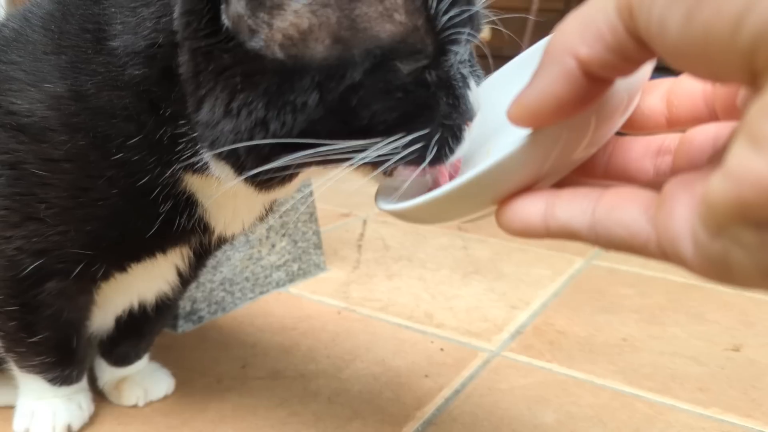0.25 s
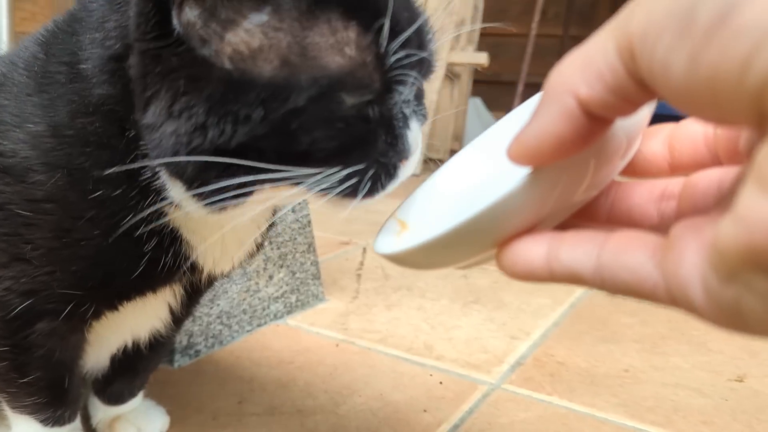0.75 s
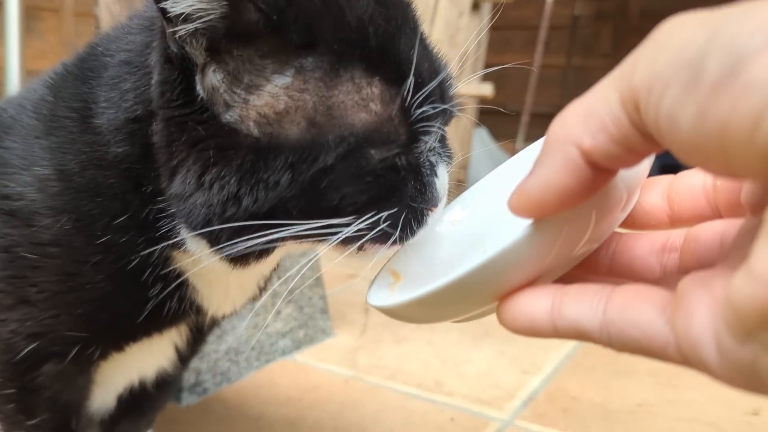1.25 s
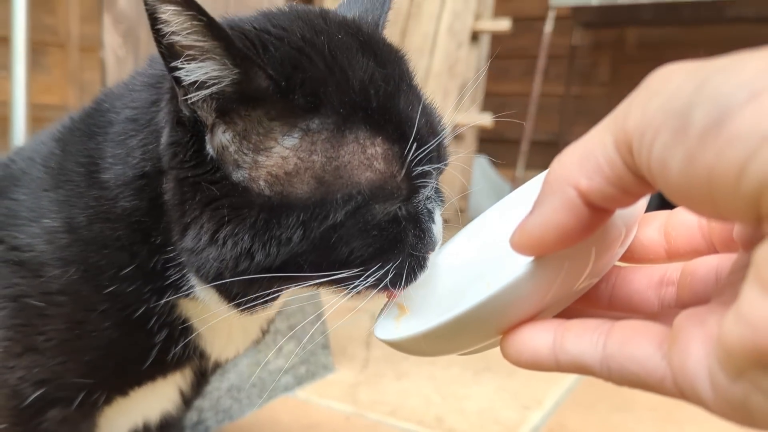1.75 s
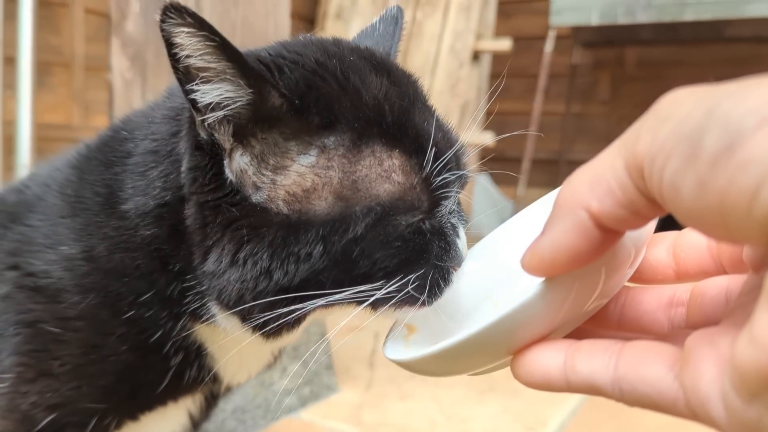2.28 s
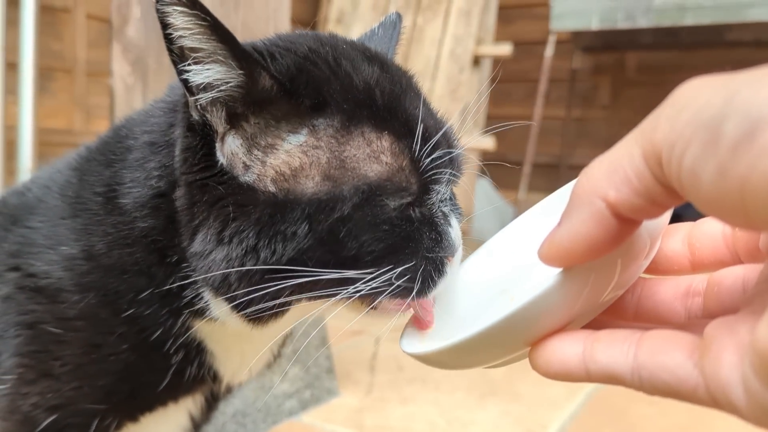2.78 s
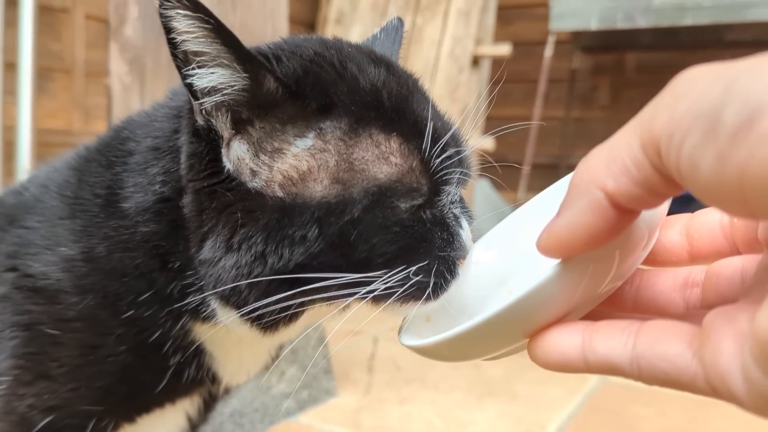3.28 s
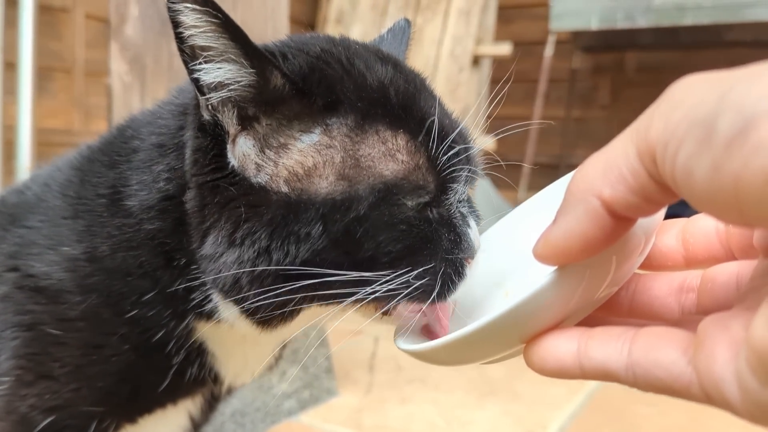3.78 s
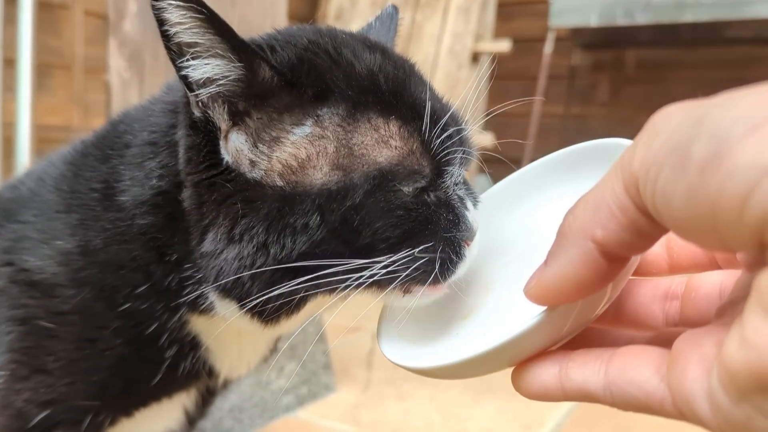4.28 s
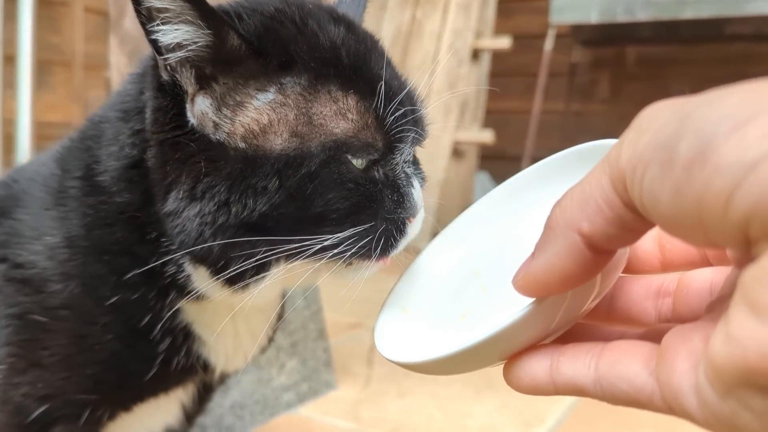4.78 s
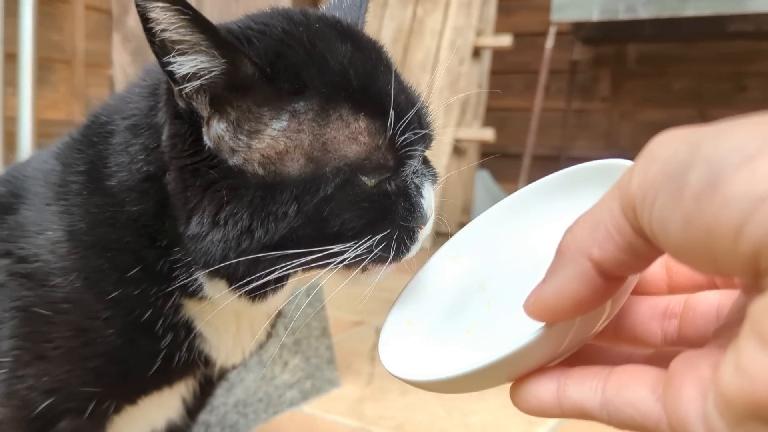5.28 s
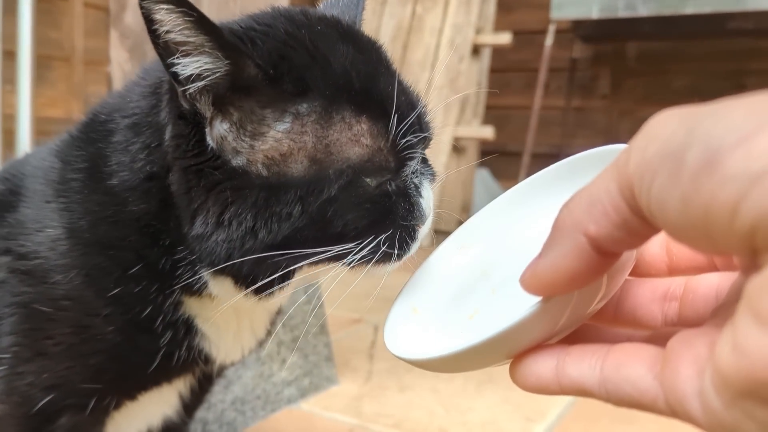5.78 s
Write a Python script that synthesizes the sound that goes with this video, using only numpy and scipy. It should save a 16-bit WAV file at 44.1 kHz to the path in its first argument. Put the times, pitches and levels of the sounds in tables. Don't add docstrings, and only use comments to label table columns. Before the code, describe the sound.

In a tiled yard, faint lip sounds give way to distinct moist clicks and dry scrapes as a cat laps close to the microphone, slightly to the right. Small birds a few metres away give quick high chirps and buzzy notes in the middle, with short wall echoes. The sharpest smacks come near five seconds. Distant traffic rumbles softly throughout, and fingers thump the phone occasionally.

```python
import sys
import numpy as np
from scipy import signal
from scipy.fft import rfft, irfft, next_fast_len
from scipy.io import wavfile
from scipy.ndimage import uniform_filter1d

SR = 44100
rng = np.random.default_rng(int(sys.argv[2]) if len(sys.argv) > 2 else 0)


def amplitude_ratio(level_db):
    exponent = np.asarray(level_db, float) / 20
    return 10 ** exponent


def inscribe(sig):
    pcm = np.round(np.clip(np.atleast_2d(sig).T, -1, 1) * 32767)
    wavfile.write(sys.argv[1], SR, pcm.astype(np.int16))


N = 266793
M = next_fast_len(N)
t = np.arange(N) / SR

# freq_hz, density_db [dB per Hz]
TOWN_SPECTRUM = [(15, -48), (45, -17), (92, -4), (131, -3.5), (356, -11), (702, -15), (1100, -24),
                 (1540, -26.5), (2800, -28), (3290, -34), (3870, -29), (4320, -36), (6140, -33.5),
                 (7630, -37), (15500, -37), (16300, -55)]
# freq_hz, correlation [0..1]
TOWN_LIKENESS = [(35, 0.1), (70, 0.82), (130, .9), (290, 0.77), (640, 0.13), (1400, .02), (16000, .01)]
# start_s, rumble_db, length_s
TRAFFIC_SURGES = [(0.001, -61.5, 0.21), (0.406, -62.5, 0.02), (0.51, -58.5, 0.22), (0.815, -61.5, 0.37),
                  (1.139, -57, 0.039), (1.259, -53, 0.025), (1.314, -55.5, 0.15), (1.595, -66, 0.15),
                  (1.747, -65, 0.19), (1.962, -55, 0.1), (2.176, -60.5, 0.3), (2.633, -57, 0.2),
                  (2.849, -57.5, 0.16), (3.114, -59.5, 0.05), (3.24, -66, 0.15), (3.487, -67, 0.064),
                  (3.598, -62.5, 0.17), (3.801, -60, 0.059), (4.091, -56, 0.12), (4.27, -60, 0.48),
                  (4.742, -61, 0.19), (4.901, -59.5, 0.053), (5.182, -55.5, 0.064), (5.406, -60, 0.16),
                  (5.571, -58.5, 0.094), (5.768, -58, 0.2), (6.001, -55, 0.12)]
# start_s, low_mode_db, low_mode_hz, high_mode_db, spit_db
SHUT_SMACKS = [(0.2019, -54.5, 1920, -58.5, -62), (0.4133, -57, 1570, -68, -71),
               (0.565, -63, 1830, -63, -68), (0.8548, -60, 1400, -50.5, -50),
               (0.867, -39.5, 1520, -37.5, -38), (1.157, -27.5, 1510, -32, -51.5),
               (1.3392, -47, 1820, -56, -70), (1.501, -35, 1620, -52, -49.5),
               (3.0967, -36, 1790, -38.5, -45.5), (3.4527, -43, 1840, -43, -42.5),
               (3.7966, -50.5, 1740, -49, -52), (4.342, -59, 1500, -64, -77), (4.4954, -49, 1500, -46, -49),
               (4.4964, -58, 1710, -51, -58), (4.8217, -47, 1850, -52, -55), (4.8461, -26, 1596, -32, -55),
               (5.1758, -43, 1670, -46, -71), (5.1845, -55, 1050, -60, -60),
               (5.185, -22.5, 1650, -25.5, -46), (5.3932, -58.5, 1690, -76, -66),
               (5.5399, -41, 1410, -31.5, -43), (5.787, -56.5, 1300, -68, -73),
               (6.0111, -64, 1360, -61, -59), (6.0325, -37, 1640, -44.5, -52)]
# start_s, low_mode_db, high_mode_hz, high_mode_db, spit_db
WIDE_SMACKS = [(1.1455, -51, 3320, -55, -77), (1.155, -62, 3640, -45.5, -55),
               (1.4922, -51, 4000, -55.5, -63), (1.7785, -62, 3580, -53, -44),
               (1.809, -42.5, 3330, -52, -52), (1.8196, -49, 3760, -45, -48),
               (1.8251, -35.5, 4200, -52, -45.5), (2.0246, -42.5, 3320, -50, -63),
               (2.152, -31.5, 3850, -40.5, -44.5), (2.3636, -51.5, 3730, -71, -67),
               (2.4704, -53, 3730, -54, -41), (2.4789, -56, 3630, -42, -46),
               (3.089, -42.5, 3360, -37.5, -54), (3.805, -54, 4100, -62, -56.5),
               (4.489, -34.5, 3570, -37, -47), (4.846, -57, 3570, -46.5, -59),
               (5.5398, -59, 3590, -37, -59), (6.025, -51, 3200, -65, -48)]
# start_s, pitch_hz, level_db, spit_db
BURSTING_BUBBLES = [(0.015, 2670, -60, -55.5), (0.1627, 3950, -66, -66), (0.2378, 940, -64, -70),
                    (0.529, 3730, -58, -62.5), (0.891, 2000, -53, -77), (1.116, 3400, -63.5, -59.5),
                    (1.461, 3520, -62, -62.5), (2.3166, 2920, -60, -64), (2.4436, 4070, -38, -52),
                    (2.4782, 2400, -35, -68), (2.7736, 3930, -58.5, -65), (2.8048, 2470, -60, -47),
                    (3.0705, 2850, -52, -51.5), (3.422, 3430, -65, -63), (3.4396, 3370, -53, -62),
                    (3.449, 4000, -64, -49), (3.7636, 3550, -65.5, -63), (4.1103, 4500, -37.5, -47.5),
                    (4.1132, 3640, -42.5, -61), (4.46, 3800, -66, -55.5), (4.512, 3900, -72, -63),
                    (4.79, 3700, -65, -49.5), (4.876, 2180, -70, -56), (5.1561, 2680, -54, -78),
                    (5.5392, 11360, -33.5, -60), (5.5392, 7600, -44, -50), (5.532, 1800, -63, -68),
                    (5.8942, 2600, -72, -52), (5.923, 2570, -54, -67), (6.044, 4900, -75, -68)]
# start_s, pitch_hz, level_db
POPPING_DROPLETS = [(0.8575, 3300, -50), (0.8582, 1500, -50), (0.867, 5550, -46), (0.867, 9760, -41),
                    (0.8845, 6000, -65), (1.151, 3300, -55), (1.1532, 3730, -53), (1.1575, 10800, -48),
                    (1.1563, 4970, -48), (3.0849, 3930, -47.5), (3.0876, 3240, -50), (3.0968, 10000, -49),
                    (3.4522, 5030, -48), (3.452, 10500, -44), (3.4535, 9300, -48), (3.4575, 5600, -55),
                    (4.4859, 3400, -41), (4.491, 3340, -40.5), (4.4923, 2500, -45), (4.4985, 7000, -52),
                    (4.4998, 2500, -56), (4.5065, 5500, -64), (4.855, 2400, -57), (4.8768, 6200, -55),
                    (4.8768, 10500, -56), (5.1805, 2700, -48), (5.1834, 3000, -50), (5.1853, 11500, -40.5),
                    (5.1885, 14500, -42), (5.1888, 6300, -47), (5.1914, 6450, -47), (5.196, 6000, -61),
                    (5.5525, 3000, -61), (5.5485, 6000, -62), (4.622, 2490, -67), (4.73, 1600, -62),
                    (3.7945, 4500, -57), (6.025, 6000, -49.5), (6.032, 12500, -48), (5.3935, 6360, -62),
                    (5.5403, 3600, -39), (5.5315, 2400, -56), (5.5397, 14000, -46), (5.5398, 15300, -45),
                    (5.5397, 12500, -42), (5.185, 13000, -45), (5.185, 15000, -47), (5.1885, 9000, -45),
                    (5.1925, 11500, -52), (5.545, 11800, -50), (5.552, 13500, -52), (5.185, 6000, -46),
                    (5.178, 2700, -50), (5.218, 6500, -63), (1.1572, 3900, -44), (0.856, 5800, -55),
                    (0.856, 9000, -55)]
# start_s, spit_db
SPIT_THREADS = [(0.573, -60), (4.29, -60), (4.638, -64), (0.7108, -65), (0.966, -71.5), (1.199, -58),
                (2.7297, -73), (3.133, -53), (3.876, -65), (3.791, -57), (3.805, -58), (6.042, -58),
                (4.153, -65), (4.89, -63), (5.4945, -54), (5.744, -52.5), (5.805, -63)]
# freq_hz, density_db [dB per Hz]
SQUELCH_COLOUR = [(700, -10), (1300, 4), (2600, 4.5), (4200, -5.5), (5500, -50)]
# freq_hz, density_db [dB per Hz]
SPIT_COLOUR = [(2940, -20), (5000, -3.5), (7530, 4.5), (8060, -0.5), (8920, 2.5), (11100, 2), (13600, -0.5),
               (15400, -9), (16000, -22)]
# freq_hz, width_hz
DISH_NOTCHES = [(2150, 357), (3050, 930)]
# start_s, level_db, length_s, brightness_db
TONGUE_RASPS = [(0.382, -49, 0.015, 11), (0.569, -57.5, 0.026, 1), (0.991, -61, 0.019, -8.5),
                (1.306, -53, 0.043, 2.5), (1.636, -54, 0.06, -1.5), (1.985, -46, 0.022, -2.5),
                (2.303, -46.5, 0.033, 19), (2.634, -45, 0.023, 6), (2.818, -46.5, 0.06, 9),
                (2.915, -53, 0.062, 21), (3.267, -50, 0.03, 26), (3.606, -52.5, 0.047, 0.5),
                (3.955, -50, 0.03, 20), (4.306, -45.5, 0.034, 12), (4.86, -71, 0.042, -1),
                (4.997, -61, 0.019, 16), (5.213, -63, 0.019, 4), (5.348, -46, 0.016, 9),
                (5.57, -59.5, 0.031, 0.5), (5.718, -57.5, 0.055, 17)]
# freq_hz, density_db [dB per Hz]
RASP_COLOUR = [(410, -41), (700, 0), (1920, -7), (2300, -1), (4150, -11), (5540, -4.5), (8100, -4.5),
               (11700, -4.5), (13000, -11), (15200, -10), (16000, -45)]
# start_s, level_db, pitch_hz
HAND_THUMPS = [
    (0.586, -50, 136),
    (1.259, -36, 100),
    (5.421, -39, 122),
    (5.785, -47, 123),
]
# start_s, level_db, length_s
SWALLOWS = [
    (.825, -60, 0.087),
    (3.478, -63.5, 0.071),
    (1.001, -61, 0.014),
]
# freq_hz, density_db [dB per Hz]
THROAT_COLOUR = [(250, -2), (400, -3.5), (800, -2), (1200, -34.0)]
# start_s, length_s, start_hz, end_hz, level_db
HIDDEN_CHIRPS = [
    (1.647, 0.021, 5090, 3426, -47.5),
    (1.804, 0.021, 5095, 3500, -43),
    (1.919, 0.027, 4200, 4800, -46.5),
    (2.104, 0.02, 5870, 3800, -49),
    (2.811, .04, 4210, 5290, -49),
    (3.003, 0.022, 3300, 3910, -58),
    (1.68, .025, 4900, 3700, -56),
    (1.84, .025, 5000, 3700, -52),
    (1.94, .025, 4800, 4300, -52),
]
# start_s, length_s, start_hz, end_hz, level_db
STRAIGHT_GLIDES = [(1.825, 0.019, 4540, 4040, -44.5), (1.892, 0.012, 3010, 3450, -50.5),
                   (1.902, 0.022, 3410, 4060, -42.5), (1.931, 0.034, 3900, 3250, -42.5),
                   (1.92, .018, 4290, 4600, -47), (2.116, 0.0174, 3380, 4090, -44),
                   (2.136, 0.016, 2910, 3500, -49), (2.148, 0.03, 3410, 4760, -44.5),
                   (3.048, 0.056, 2807, 2700, -55), (1.658, .012, 3900, 3450, -51),
                   (2.825, .02, 2250, 2600, -65), (2.925, .02, 2300, 2500, -69),
                   (3.012, .015, 3500, 3850, -57)]
# start_s, length_s, top_hz, level_db
HELD_NOTES = [(2.024, 0.016, 7210, -50), (2.04, .026, 7210, -44.5), (2.071, .012, 7200, -48),
              (2.085, .015, 7200, -52), (2.11, .015, 7200, -55), (2.038, 0.064, 8820, -62),
              (2.036, 0.018, 5550, -53), (2.05, 0.018, 5700, -44), (2.074, 0.015, 5550, -40.5),
              (2.176, 0.026, 4630, -54), (2.094, 0.026, 5640, -39.5), (2.115, .07, 5580, -51),
              (2.9, 0.039, 7500, -63), (2.782, 0.036, 5460, -49.5), (2.82, 0.039, 5450, -55.5),
              (2.864, 0.062, 5450, -66), (2.762, 0.024, 5500, -65), (2.222, 0.018, 4620, -58),
              (2.82, 0.06, 4350, -55.5)]
# start_s, length_s, start_hz, level_db
HOOKED_NOTES = [
    (2.397, 0.039, 3720, -44),
    (2.47, 0.037, 3750, -44.5),
    (2.543, 0.038, 3760, -46),
]
# start_s, length_s, start_hz, middle_hz, end_hz, level_db
BUZZY_NOTES = [(1.664, 0.028, 4200, 4340, 4070, -47.5), (1.81, 0.0302, 4900, 4710, 4600, -55),
               (2.362, .02, 3620, 4230, 5000, -59.5), (2.374, 0.07, 5100, 4800, 4750, -51),
               (2.439, 0.055, 5000, 5000, 4800, -50.5), (2.49, .03, 4800, 4750, 4900, -56),
               (2.518, 0.047, 5150, 4850, 4700, -54.5), (2.804, .04, 4500, 4660, 5300, -57.5),
               (2.305, 0.0256, 6600, 7000, 6300, -52), (2.66, 0.04, 8900, 8700, 8400, -59),
               (2.69, .04, 8000, 7700, 7500, -62), (2.91, 0.038, 7600, 7500, 7400, -57),
               (2.822, 0.0506, 5100, 4800, 4480, -51.5)]
# freq_hz, gain_db
LEFT_PORT_GAIN = [(200, -3.5), (700, 2), (1300, 3), (2400, 9.5), (4400, 8.5), (5800, 7.5), (8100, -8.5),
                  (15000, 0)]
# freq_hz, lag_rad
LEFT_PORT_LAG = [(20, 0), (600, 0.49), (1500, 1.5), (2300, 1.5), (4200, 6), (7000, 9), (16000, 15.5)]

MUTE_DB = -120


def read_curve(table, hz):
    points = np.array(table)
    return np.interp(np.log(np.maximum(hz, 1)), np.log(points[:, 0]), points[:, 1])


def colour(x, table):
    gain = amplitude_ratio(read_curve(table, np.fft.rfftfreq(M, 1 / SR)))
    y = irfft(rfft(x, M) * gain, M)[..., :N]
    return y / np.sqrt(np.mean(y ** 2))


def add(out, start_s, grain):
    i = int(start_s * SR)
    out[i:i + len(grain)] += grain[:max(N - i, 0)]


def walk(rate_hz):
    k = int(SR / rate_hz)
    steps = np.repeat(rng.standard_normal(N // k + 1), k)
    return 1.39 * uniform_filter1d(uniform_filter1d(steps, k), k)[:N]


def swell(length_s):
    u = t[:int(3 * length_s * SR)] / (0.31 * length_s)
    return u * np.exp(1 - u)


def ring(u, hz, t60_s, rise_s):
    return np.sin(2 * np.pi * hz * u) * amplitude_ratio(-60 * u / t60_s) * (1 - np.exp(-u / rise_s)) ** 2


def echoes(x, t60_s, gap_s, wet_db):
    u = t[:SR // 2]
    tail = rng.standard_normal((2, len(u))) * amplitude_ratio(-60 * u / t60_s) * (u > gap_s)
    tail = tail * amplitude_ratio(wet_db) / np.sqrt(np.sum(tail ** 2, axis=1, keepdims=True))
    return signal.fftconvolve(x[None], tail, axes=1)[:, :N]


def ports(x, nearness):
    f = np.fft.rfftfreq(M, 1 / SR)
    path = amplitude_ratio(nearness * read_curve(LEFT_PORT_GAIN, f)) * np.exp(-1j * read_curve(LEFT_PORT_LAG, f))
    return np.array([irfft(rfft(x[0], M) * path, M)[:N], x[1]])


def air_levels(near):
    rumble_db, murmur_db, hiss_db = -69.5, -80.5, -83.5
    gate_db, gate_s = -75.5, 0.023
    size = np.full(N, amplitude_ratio(rumble_db))
    for start_s, level_db, length_s in TRAFFIC_SURGES:
        add(size, start_s, amplitude_ratio(level_db) * swell(length_s))
    surge = 20 * np.log10(size) - rumble_db
    keep = np.exp(-1 / (gate_s * SR))
    power = uniform_filter1d(near ** 2, size=900)
    over_gate_db = 10 * np.log10(1 + power / amplitude_ratio(2 * gate_db))
    opening = signal.lfilter([1 - keep], [1, -keep], over_gate_db)
    murmur = murmur_db + 0.52 * surge + 0.18 * opening
    hiss = hiss_db + 0.051 * surge + 0.49 * opening
    return rumble_db + surge, murmur, hiss


def town(near, hum_hz=120, hum_width_hz=14, hum_db=-6.5):
    f = np.fft.rfftfreq(M, 1 / SR)
    gust = walk(16)
    mid, side = rfft(rng.standard_normal((2, M))) * amplitude_ratio(read_curve(TOWN_SPECTRUM, f))
    like = np.clip(read_curve(TOWN_LIKENESS, f), 0, 1)
    pair = np.sqrt(1 + like) * mid + np.sqrt(1 - like) * side * np.array([[1], [-1]])
    rustle = walk(24.98)
    ranges_hz = ((60, 330), (500, 1300), (9500, 15000))
    plain = [np.std(irfft(pair * (f > lo) * (f < hi), M)) for lo, hi in ranges_hz]
    rumble, murmur, hiss = (db - 20 * np.log10(p) for db, p in zip(air_levels(near), plain))
    out = 0
    for k in range(11):
        octave = np.log2(np.maximum(f, 1) / 22) - k
        window = np.cos(np.pi / 2 * np.clip(octave, -1, 1)) ** 2
        band = irfft(pair * window, M)[:, :N]
        bass = np.clip((5.2 - k) / 3.8, 0, 1)
        treble = np.clip((k - 5.2) / 1.8, 0, 1)
        gain_db = bass * (rumble - 2.5 + 1.26 * gust)
        gain_db = gain_db + (1 - bass - treble) * (murmur + 2.65 + 1.8 * rustle)
        gain_db = gain_db + treble * (hiss + 3.63)
        out = out + band * amplitude_ratio(gain_db + 1.57 * walk(14))
    drone = rng.standard_normal((3, M))
    resonance = 1 + (2 * (f - hum_hz) / hum_width_hz) ** 2
    hum = irfft(rfft(drone[0] + 0.3 * drone[1:]) / resonance, M)[:, :N]
    return out + hum / np.std(hum) * plain[0] * amplitude_ratio(rumble + hum_db + 2.0 * gust)


def pop_events():
    shut_hz = 2700
    return ([(s, low, hz, shut_hz, high, spit) for s, low, hz, high, spit in SHUT_SMACKS]
            + [(s, low, 0.5 * hz, hz, high, spit) for s, low, hz, high, spit in WIDE_SMACKS]
            + [(s, MUTE_DB, hz, hz, db, spit) for s, hz, db, spit in BURSTING_BUBBLES]
            + [(s, MUTE_DB, hz, hz, db, MUTE_DB) for s, hz, db in POPPING_DROPLETS]
            + [(s, MUTE_DB, shut_hz, shut_hz, MUTE_DB, spit) for s, spit in SPIT_THREADS])


def pops(low_t60_s=0.0044, high_t60_s=0.0031, spit_t60_s=0.034, before_s=0.013, after_s=0.04):
    mouth, spit, squelch = np.zeros((3, N))
    u = t[:2000]
    lead_s = 0.012
    for start_s, low_db, low_hz, high_hz, high_db, spit_db in pop_events():
        low = amplitude_ratio(low_db + 16) * ring(u, low_hz, low_t60_s, 0.00034)
        high = amplitude_ratio(high_db + 20.5) * ring(u, high_hz, high_t60_s, 0.00032)
        add(mouth, start_s + 0.00034, low - high)
        spray = amplitude_ratio(-60 * u / 0.0066) + amplitude_ratio(-8.5 - 60 * u / spit_t60_s)
        add(spit, start_s + 0.00058, amplitude_ratio(spit_db + 4.0) * spray * (1 - np.exp(-u / 0.00014)))
        slope = np.maximum((lead_s - u) / before_s, (u - lead_s) / after_s)
        add(squelch, start_s - lead_s, amplitude_ratio(max(low_db, high_db) - 22.5 - 60 * slope))
    bubbles = amplitude_ratio(3 * walk(700)) * rng.standard_normal((3, N))
    mouth = mouth + squelch * colour(bubbles[2], SQUELCH_COLOUR)
    return mouth, spit * colour(bubbles[0] + 6.6 * bubbles[:2], SPIT_COLOUR)


def dish(x):
    return np.array([signal.lfilter(*signal.iirnotch(hz, hz / width_hz, SR), x)
                     for hz, width_hz in DISH_NOTCHES])


def rasps(grain_db=3.5):
    ticks = rng.standard_normal((2, N)) * amplitude_ratio(grain_db * walk(500))
    bright = colour(ticks[0] + 2.0 * ticks, RASP_COLOUR)
    dull = signal.sosfilt(signal.butter(2, 4500, fs=SR, output="sos"), bright)
    low, high = np.zeros((2, N))
    for start_s, level_db, length_s, bright_db in TONGUE_RASPS:
        add(low, start_s - 0.006, amplitude_ratio(level_db - 8.0 - bright_db) * swell(length_s))
        add(high, start_s - 0.006, amplitude_ratio(level_db - 9.0) * swell(length_s))
    return low * dull + high * (bright - dull)


def thumps():
    out, u = np.zeros(N), t[:4000]
    for start_s, level_db, hz in HAND_THUMPS:
        add(out, start_s, amplitude_ratio(level_db + 0.5) * ring(u, hz, 0.069, 0.0027))
    return out * np.array([[1], [0.7]])


def gulps():
    size = np.zeros(N)
    for start_s, level_db, length_s in SWALLOWS:
        add(size, start_s, amplitude_ratio(level_db) * swell(length_s))
    return size * amplitude_ratio(3.0 * walk(150)) * colour(rng.standard_normal(N), THROAT_COLOUR)


def note(length_s, start_hz, middle_hz, end_hz, level_db, warble, warble_hz, fade=0.72):
    u = np.linspace(-1, 1, int(length_s * SR))
    bend_hz = (start_hz + end_hz) / 2 - middle_hz
    hz = middle_hz + (end_hz - start_hz) / 2 * u + bend_hz * u ** 2
    hz = hz * (1 + warble * np.sin(np.pi * warble_hz * length_s * u))
    envelope = (1 + u) ** 0.59 * (1 - u) ** fade
    return amplitude_ratio(level_db) * envelope * np.sin(2 * np.pi * np.cumsum(hz) / SR)


def whistles():
    arch = 0.015
    return ([(s, n, a, (a + b) / 2, b, db) for s, n, a, b, db in STRAIGHT_GLIDES]
            + [(s, n, hz * (1 - arch), hz, hz * (1 - arch / 2), db) for s, n, hz, db in HELD_NOTES])


def birds(husk_db=-11, flutter_db=3.0, patchy_db=2, tail_gate_db=-74, close_echo_db=-2.5, leaves_db=-5):
    song, hidden, close = np.zeros((3, N))
    for s, length_s, a, b, db in HIDDEN_CHIRPS:
        add(hidden, s, note(length_s, a, (a + b) / 2, b, db, warble=0.03, warble_hz=189))
    for s, *shape in whistles():
        add(song, s, note(*shape, warble=0.0082, warble_hz=105.0))
    for s, length_s, hz, db in HOOKED_NOTES:
        hook = note(length_s, hz, hz * 0.975, hz * 0.76, db, warble=0.006, warble_hz=105.0, fade=0.8)
        add(close, s, hook)
    for s, *shape in BUZZY_NOTES:
        add(song, s, note(*shape, warble=0.044, warble_hz=167.5))
    flutter, husk = amplitude_ratio(flutter_db * walk(320)), walk(1800)
    hidden = hidden * (1 + amplitude_ratio(leaves_db) * husk)
    flutter = flutter * (1 + amplitude_ratio(husk_db) * husk)
    direct = flutter * (song + close + amplitude_ratio(-12) * hidden)
    to_walls = flutter * (song + hidden + amplitude_ratio(close_echo_db) * close)
    near = echoes(to_walls, t60_s=0.074, gap_s=0.002, wet_db=-7)
    far = echoes(to_walls, t60_s=0.33, gap_s=0.012, wet_db=-8.0)
    power = uniform_filter1d((direct + near[1] + far[1]) ** 2, size=2000)
    gate = power / (power + amplitude_ratio(2 * tail_gate_db))
    return direct + near + gate * far * amplitude_ratio(patchy_db * walk(39.9))


def scene():
    mouth, spit = pops()
    dish_share = 0.9
    cat = (1 - dish_share) * mouth + dish_share * dish(mouth) + spit + rasps()
    cat = cat + echoes(cat[0], t60_s=0.018, gap_s=0.00117, wet_db=-16.5)
    near = cat + birds()
    distant = ports(town(near[1]), nearness=0.29)
    return ports(near + gulps(), nearness=0.95) + distant + thumps()


def low_pass(x):
    return signal.sosfilt(signal.butter(12, 16430, fs=SR, output="sos"), x)


def record(dry):
    top = signal.ellip(8, 0.2, 70, 16250, fs=SR, output="sos")
    mix = signal.sosfilt(top, dry)
    return low_pass(mix)


dry = scene()
out = record(dry)
inscribe(out)
```